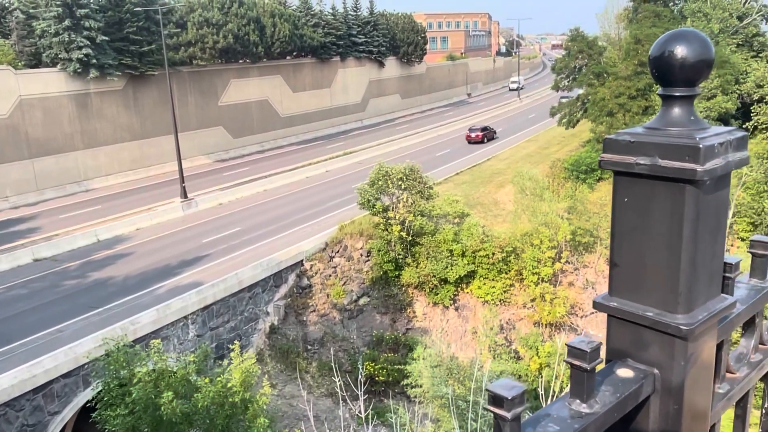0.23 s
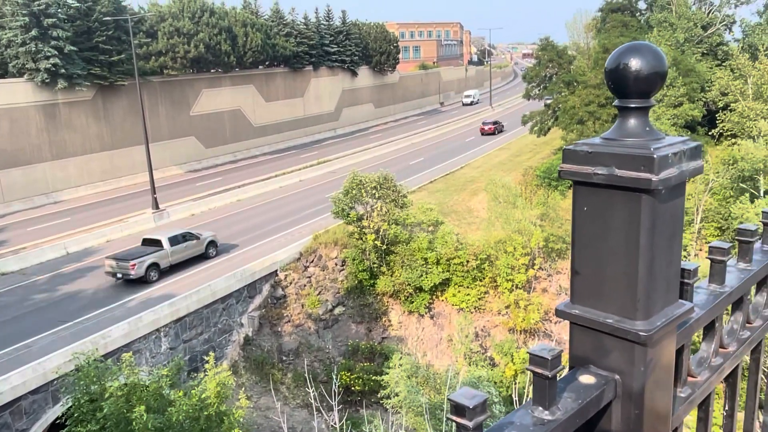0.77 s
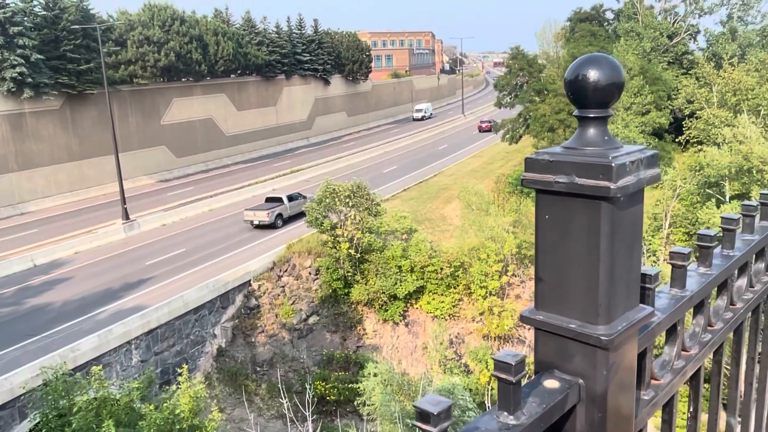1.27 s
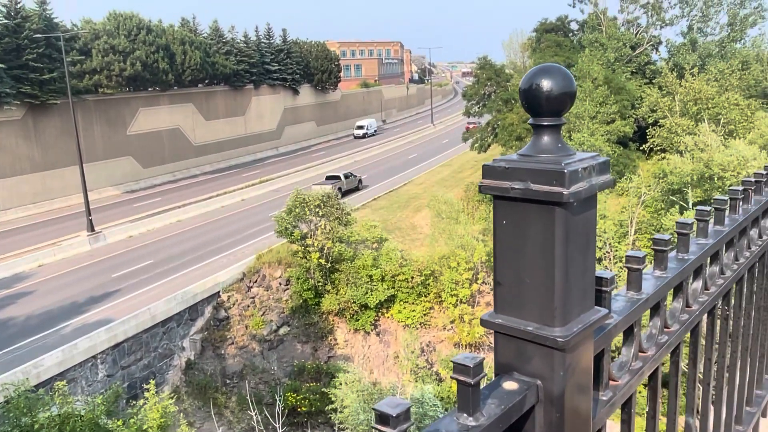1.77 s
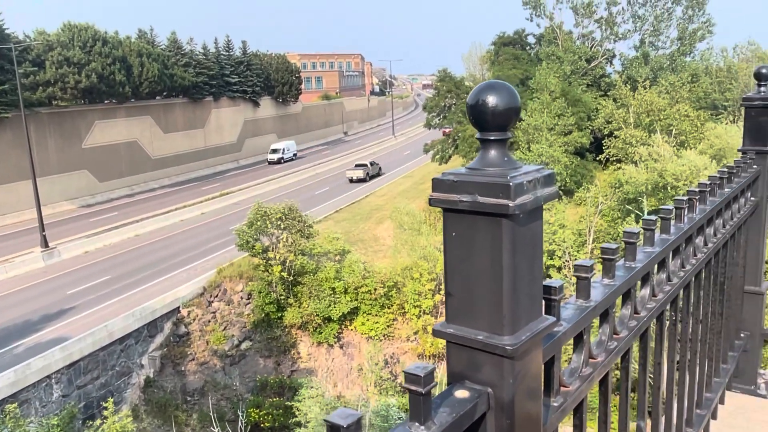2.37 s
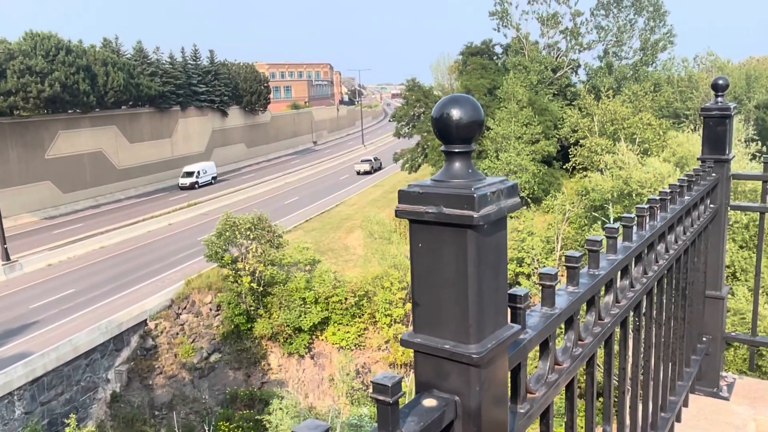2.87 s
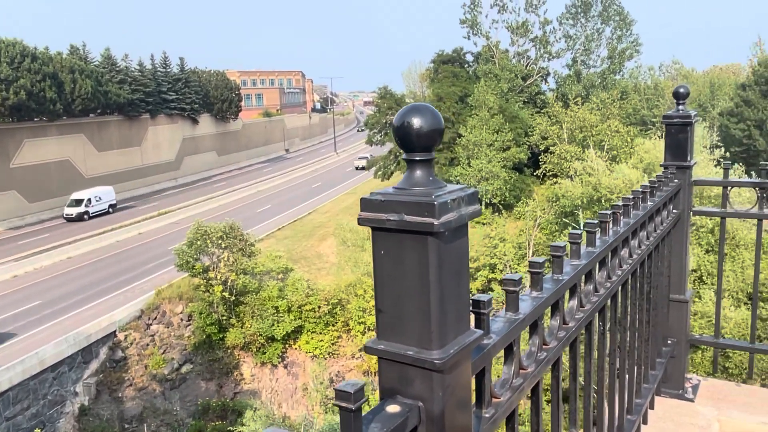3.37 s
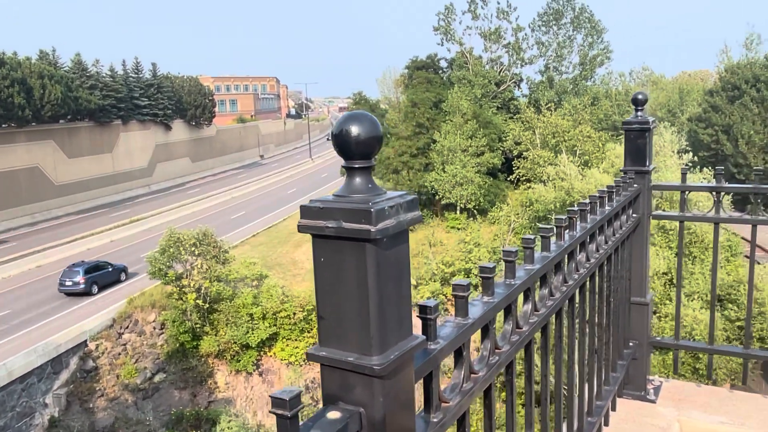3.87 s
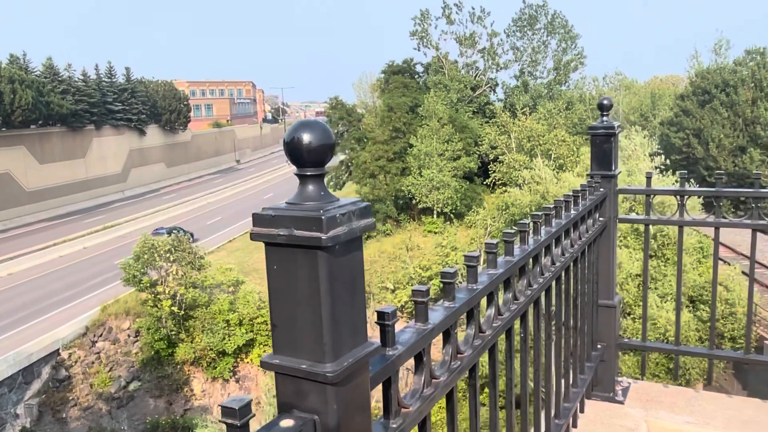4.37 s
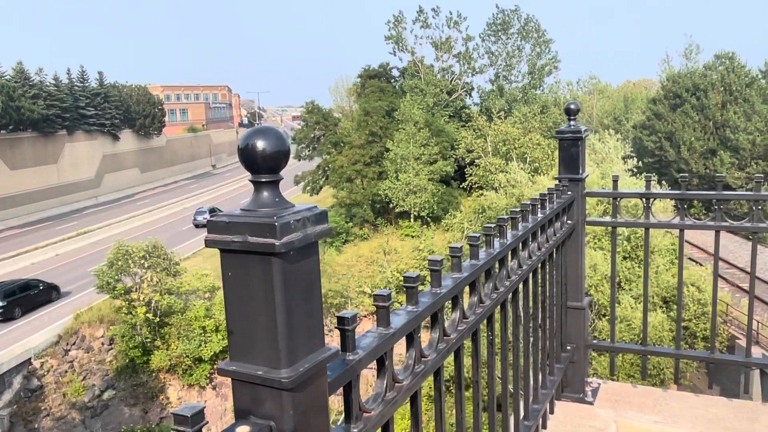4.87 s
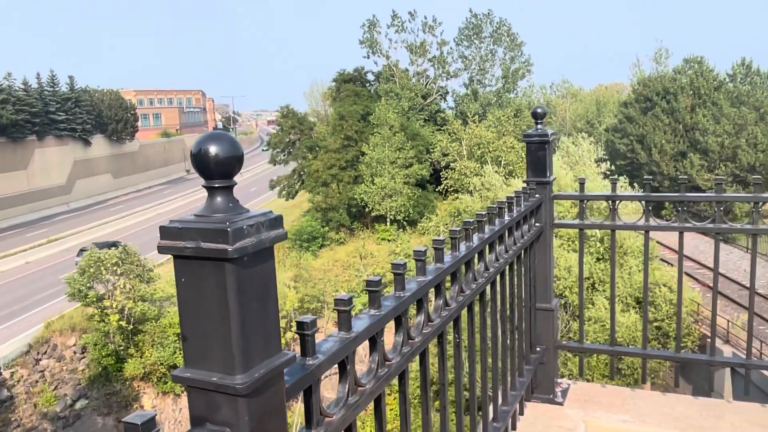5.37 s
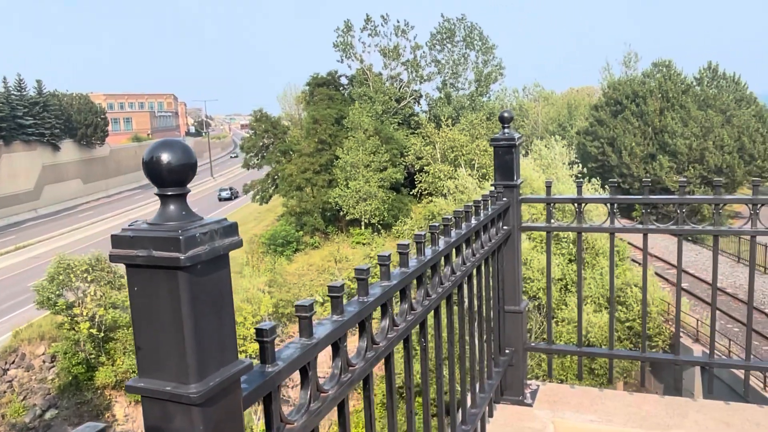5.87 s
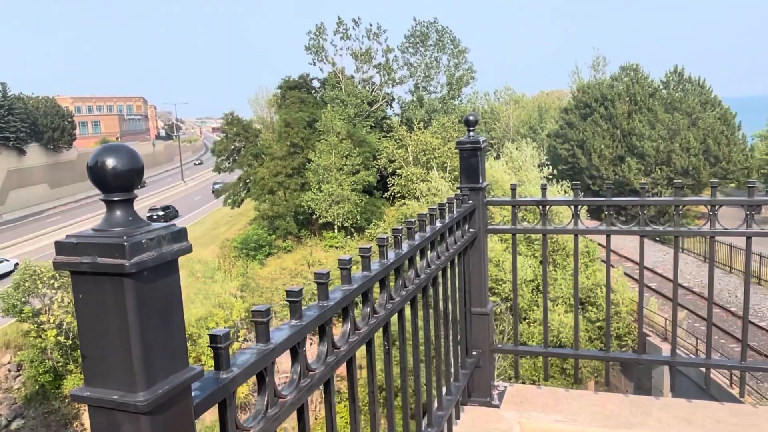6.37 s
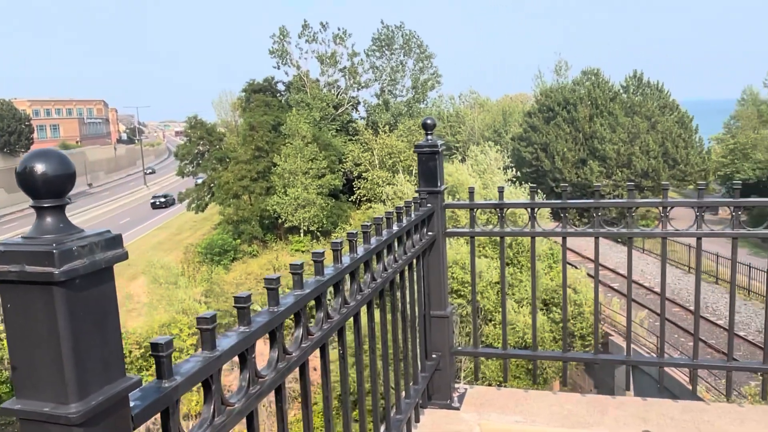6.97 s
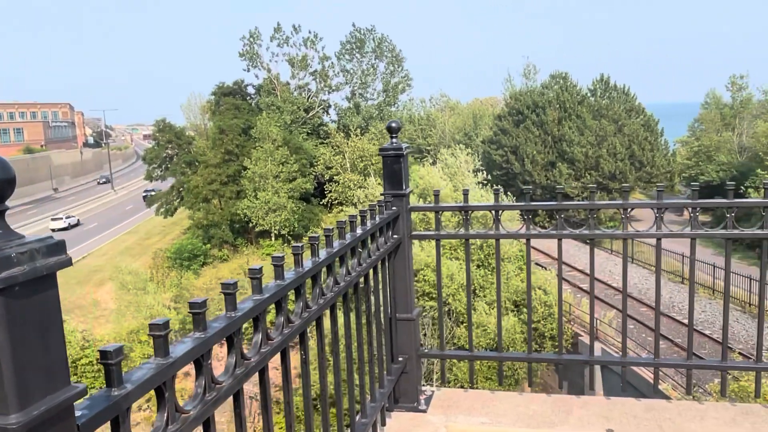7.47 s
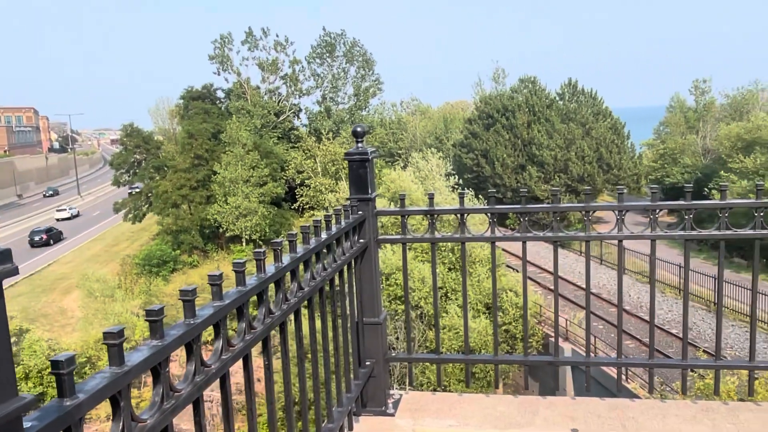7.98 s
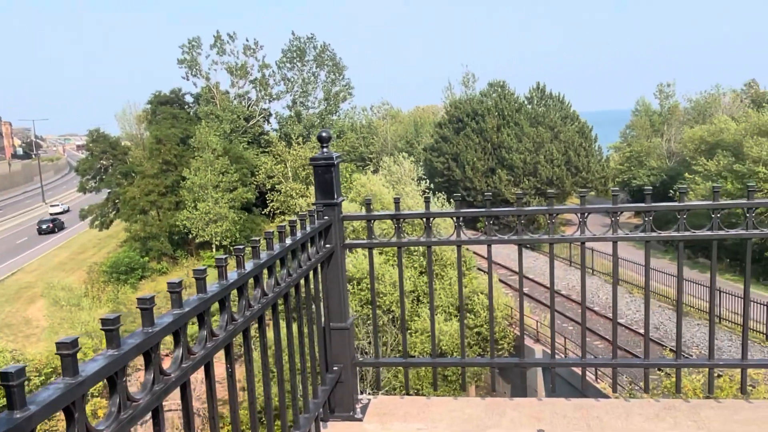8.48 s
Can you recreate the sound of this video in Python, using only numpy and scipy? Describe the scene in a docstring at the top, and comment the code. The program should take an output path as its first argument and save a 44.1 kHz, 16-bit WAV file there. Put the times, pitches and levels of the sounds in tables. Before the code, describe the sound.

Steady highway traffic roars below an overlook, single cars swelling past, two quick joint slaps, and low wind thumps on the microphone.

```python
"""A steady drone and tyre roar rise from a highway below an overlook, swelling as single cars go by.
Coloured noise makes the merged traffic.
Cars near and far, and passing changes in the roar, swell in narrower noise bands.
Two vehicles slap and rattle over a road joint, front axle then rear: short rings that sag in pitch.
Light wind rumbles on the microphone as low noise, and now and then thumps it with one short swing."""
import sys
import numpy as np
from scipy import signal
from scipy.fft import rfft, irfft, next_fast_len
from scipy.io import wavfile
from scipy.ndimage import uniform_filter1d, map_coordinates

SR = 44100
rng = np.random.default_rng(int(sys.argv[2]) if len(sys.argv) > 2 else 0)


def dump_mix(stems):
    """Bounce the given channels to the path in sys.argv[1] as a 16-bit WAV at rate SR."""
    frames = np.atleast_2d(stems).T  # one column per channel
    limited = np.clip(frames, -1, 1)  # hard clip at full scale
    pcm = np.round(limited * 32767).astype(np.int16)
    wavfile.write(sys.argv[1], SR, pcm)


N = 384269  # length in samples


def amp(db):
    """Turn decibels into a gain."""
    return 10 ** (np.asarray(db) / 20)


def unit(x):
    """Scale a sound to an rms of 1."""
    return x / np.sqrt(np.mean(x ** 2) + 1e-20)


def along(points, hz):
    """Read each column of a table at the given frequencies, on a log axis."""
    f, *columns = np.transpose(points)
    return [np.interp(np.log(hz + 1), np.log(f), column) for column in columns]


def wobble(rate):
    """Draw a smooth random curve through `rate` random points a second."""
    knots = rng.standard_normal(4096)
    return map_coordinates(knots, [np.arange(N) * rate / SR])


def swell(s, half):
    """A bell-shaped rise and fall around time s, 1 at the top."""
    return np.exp(-((np.arange(N) / SR - s) / half) ** 2)


def filtered(x, response):
    """Shape a sound by a gain that depends on frequency."""
    m = next_fast_len(N + SR // 4, True)  # spare room so the end does not wrap round to the start
    spectrum = rfft(x, m) * response(np.fft.rfftfreq(m, 1 / SR))
    return irfft(spectrum, m)[..., :N]


def rush(spectrum, patchy_db):
    """Two unrelated noises of one colour, sharing patches of gain that drift in time and pitch."""
    z = signal.stft(rng.standard_normal((2, N)), nperseg=1024)[2]
    field = rng.standard_normal(z.shape[1:])
    field = uniform_filter1d(field, size=8, axis=0)  # smooth across pitch
    field = uniform_filter1d(field, size=7, axis=1)  # smooth across time
    patchy = z * amp(patchy_db * unit(field))
    pair = signal.istft(patchy, nperseg=1024)[1][:, :N]
    return unit(filtered(pair, lambda hz: amp(along(spectrum, hz)[0])))


# how close the stream of traffic runs: t/s, level/dB (each layer follows it by its own share)
TRAFFIC = [(0, 3.5), (.9, 0.3), (2.2, -0.5), (3.7, 1), (5.0, -0.7), (5.9, -5), (7.3, -6.5), (8.71, -5.5)]


def traffic_db():
    """The slow rise and fall of the traffic, before each layer scales it."""
    s, level_db = np.transpose(TRAFFIC)
    return np.interp(np.arange(N) / SR, s, level_db)


FLUTTER_DB, FLUTTER_RATE = .58, 21  # tyre noise flutters: depth in dB, random points a second


def flutter_db():
    """The quick, small unsteadiness of tyre noise."""
    return FLUTTER_DB * wobble(FLUTTER_RATE)


# colour of the engines: f/Hz, level/dB (per Hz, relative)
DRONE_SPECTRUM = [(40, -23), (90, -2.5), (150, -3), (200, 1), (280, -1.5), (360, -5), (460, -8), (600, -12),
                  (900, -39), (2000, -76)]


def drone(level_db=-32, follows=0.17):
    """Many engines merge into a low, nearly steady noise."""
    gain_db = level_db + follows * traffic_db() + 0.4 * wobble(6.1)
    return amp(gain_db) * rush(DRONE_SPECTRUM, patchy_db=0.0)


# colour of the rolling tyre carcasses: f/Hz, level/dB (per Hz, relative)
ROLLING_SPECTRUM = [(150, -8), (330, -7), (450, -8.5), (570, -2.5), (640, 3.5), (720, -4.5), (820, -7.5),
                    (1100, -2.5), (1600, -17), (3000, -60), (6000, -100)]


def rolling(level_db=-31.5, follows=1.5):
    """Tyre carcasses roll; this layer follows the traffic far more strongly than the others."""
    gain_db = level_db + follows * traffic_db() + 1.34 * wobble(5.0)
    return amp(gain_db) * rush(ROLLING_SPECTRUM, patchy_db=1.0)


# colour of the tyre roar: f/Hz, level/dB (per Hz, relative)
ROAR_SPECTRUM = [(300, -22), (520, -15.5), (640, -9.5), (720, -4.5), (800, 0.24), (1000, -1.7), (1500, -2),
                 (1900, -7.5), (2350, -19.5), (2900, -17.5), (3800, -28), (8000, -93)]


def roar(level_db=-25.5, follows=0.17, bunch_db=1.12):
    """Tyres roar; many of them average out, and a bunch of cars in the near lanes lifts the sound."""
    lift_db = bunch_db * swell(4.4, half=3.1) + flutter_db()
    gain_db = level_db + follows * traffic_db() + lift_db
    return amp(gain_db) * rush(ROAR_SPECTRUM, patchy_db=.9)


# colour of the tread hiss: f/Hz, level/dB (per Hz, relative)
HISS_SPECTRUM = [(1200, -30), (2400, -3), (2950, 2), (3900, -1), (5100, -1.5), (6300, -6.8), (7100, -12.5),
                 (8000, -18), (10000, -24), (12500, -36), (14000, -54)]


def hiss(level_db=-44.5, follows=0.17, bunch_db=3.36):
    """Air squeezed from the treads of the nearest few tyres hisses, so it is clumpier than the roar."""
    lift_db = bunch_db * swell(5.07, half=1.6) + flutter_db()
    gain_db = level_db + follows * traffic_db() + lift_db
    return amp(gain_db) * rush(HISS_SPECTRUM, patchy_db=1.6)


def stream():
    """Many vehicles merge into one sound with four layers."""
    return drone() + rolling() + roar() + hiss()


# swells of cars near and far (tyre song or engine hum) and passing changes in the roar:
# t/s, level/dB (at the top of the swell, before flutter and ports), centre f/Hz, width/octaves,
# half length/s (time from the top to half the amplitude)
CARS = [(0.01, -20.5, 520, 0.89, 0.043), (0.17, -31, 314, 0.21, 0.26), (0.19, -31, 900, 0.37, 0.13),
        (0.383, -48, 4470, 0.52, 0.15), (1.06, -36, 242, 0.16, 0.44), (1.8, -38.5, 1840, 0.17, 1),
        (1.8, -39.5, 647, 0.1, 0.6), (2.29, -48, 4740, 0.29, 0.034), (2.51, -31.5, 1100, 0.6, 0.081),
        (2.614, -28.5, 704, 0.54, 0.075), (3.293, -28, 900, 0.52, 0.06), (3.5, -47, 4350, 0.38, 0.23),
        (3.597, -30, 710, 0.41, 0.12), (3.61, -31.5, 208, 0.36, 0.11), (3.688, -34.5, 1840, 0.18, 0.19),
        (4.15, -32.5, 198, 0.17, 0.25), (4.15, -43, 4660, 0.32, 0.056), (4.27, -40.5, 4300, 0.31, 0.14),
        (4.4, -33, 885, 0.62, 0.18), (4.902, -45.5, 2950, 0.15, .25), (4.75, -35.5, 1890, 0.17, 1),
        (5.335, -28, 830, 0.52, 0.12), (5.478, -34.5, 265, 0.59, 0.35), (5.95, -37, 282, 0.13, 0.67),
        (6.146, -45, 4900, 0.25, 0.05), (6.3, -47, 4830, 0.3, 0.64), (7.574, -32, 1650, 0.41, 0.17),
        (7.74, -33, 905, 0.6, 0.14), (7.55, -49.5, 4870, 0.3, 0.37), (7.583, -41, 2600, 0.3, 0.17),
        (6.6, -34.5, 1350, 0.14, 0.44), (7.8, -32.5, 1280, 0.087, 0.84), (8.3, -40.5, 790, 0.064, 0.54)]


def cars():
    """Cars near and far, and passing changes in the roar, rise and fall in narrower noise bands."""
    t, out = np.arange(N) / SR, np.zeros((2, N))
    for s, db, centre_hz, octaves, half in CARS:
        band = lambda hz: np.exp(-.5 * (np.log2((hz + 1) / centre_hz) / octaves) ** 2)
        noise_band = unit(filtered(rng.standard_normal((2, N)), band))
        rise_and_fall = 1 / (1 + ((t - s) / half) ** 2)  # for a car: spreading and forward beam together
        out += amp(db) * rise_and_fall * noise_band
    return out * amp(flutter_db())


# tyres slapping a road joint and rattling after it:
# t/s (start), level/dB (before JOINT_DB and ports), cavity f/Hz (the middle of the pitch sag)
SLAPS = [(.514, -22, 870), (.528, -23, 700), (.541, -23, 660), (.631, -22, 790), (.689, -18, 800),
         (.700, -24, 820), (4.292, -16.5, 800), (4.309, -17, 850), (4.324, -18, 920), (4.335, -23, 850),
         (4.419, -16, 850), (4.434, -15.5, 840), (4.450, -25, 780)]
JOINT_DB = 2.4  # how loudly the road joint carries to the overlook, in dB


def joint(rise_s=0.0042, sag=0.12, rough=0.5):
    """A tyre rolling over the joint pumps the air in the gap: a ring that builds, sags in pitch and dies."""
    t, out = np.arange(SR // 16) / SR, np.zeros((2, N))
    pump = (t / rise_s) ** 2 * np.exp(2 * (1 - t / rise_s))  # loudest after rise_s
    pitch = 1 + sag * (np.exp(-t / rise_s) * 2 - 1)  # from 12 % above the cavity pitch to 12 % below
    glide = np.cumsum(pitch) / SR
    hz = np.fft.rfftfreq(len(t), 1 / SR)
    for s, db, cavity_hz in SLAPS:
        band = np.exp(-(np.log2((hz + 1) / cavity_hz) / 0.55) ** 2)
        random_phase = np.exp(2j * np.pi * rng.random(len(band)))
        grit = unit(irfft(band * random_phase, len(t)))
        ring = np.sin(2 * np.pi * cavity_hz * glide) + rough * grit
        # row 0 is the part that both ports share
        out[0, round(s * SR):][:len(t)] += amp(db + JOINT_DB) * pump * ring
    return out


# the two microphone ports: f/Hz, likeness (coherence, 0 to 1), left lead/rad, left over right level/dB
PORTS = [(100, .85, 0, -2), (280, .94, .05, -4), (440, .65, .7, -7), (560, .88, 1.6, -4),
         (850, .73, 2.0, -.3), (1500, .56, 2.75, -2), (1850, .25, 4.3, -2), (2100, .4, 6.1, -.5),
         (2350, .5, 6.6, 0), (2800, .55, 5.2, -3.8), (3600, .3, 6.1, -1), (4300, .62, 5.8, .3),
         (5400, .3, 5.2, -2), (6100, .33, 6.6, 0), (7000, .65, 8.9, 0), (8300, .8, 9.6, 0),
         (10500, .6, 11.5, 0)]


def at_ports(pair):
    """Road sound reaches the two ports partly alike, shifted in phase and shaded by the casing."""
    m = next_fast_len(N + SR // 4, True)
    alike, lead, balance_db = along(PORTS, np.fft.rfftfreq(m, 1 / SR))
    # mix a shared and an opposed part so that the ports agree as much as the table says
    turn = np.arccos(np.clip(alike, 0, 1)) / 2
    common, apart = rfft(pair, m) * [np.cos(turn), np.sin(turn)]
    skew = amp(balance_db / 2) * np.exp(.5j * lead)  # half to the left, the opposite half to the right
    left, right = (common + apart) * skew, (common - apart) / skew
    return irfft(np.array([left, right]), m)[:, :N]


# colour of the wind rumble: f/Hz, level/dB (per Hz, relative)
RUMBLE_SPECTRUM = [(20, -42), (35, -25), (52, 0), (66, 0), (88, 0.5), (130, -8), (200, -13.5), (400, -31),
                   (1200, -71)]
# colour of the flapping in strong gusts: f/Hz, level/dB (per Hz, relative)
FLAP_SPECTRUM = [(60, -25), (130, 0), (350, -3), (550, -12), (1200, -45), (3000, -90)]
# gusts on the microphone: t/s, rumble level/dB (before the breeze and ports), half length/s
GUSTS = [(0.136, -29, 0.04), (0.58, -28.5, 0.14), (1.03, -28.5, 0.16), (1.93, -32, 0.1),
         (2.222, -26.5, 0.08), (2.5, -32, .04), (4.38, -27, 0.11), (4.66, -29, 0.07), (4.88, -30, 0.09),
         (5.4, -34, 0.12), (5.88, -32, .12), (7.346, -32, 0.047), (7.78, -31, 0.16), (8.31, -24.5, 0.12),
         (8.58, -26, 0.057)]
BREEZE_DB, BREEZE_WAVER_DB = -33.5, 1.3  # the wind between gusts: level and waver in dB
FLAP_DB = -7  # flapping in the strongest gust, in dB over the rumble


def wind(lumpy_db=2.0, apart=0.5):
    """A breeze and its gusts rumble, partly different on each port; a strong gust also flaps higher up."""
    breeze = amp(BREEZE_DB + BREEZE_WAVER_DB * wobble(7))
    gust_power = sum(amp(db) ** 2 * swell(s, half) for s, db, half in GUSTS)
    strength = np.sqrt(breeze ** 2 + gust_power)
    flapping = amp(FLAP_DB) * (strength / strength.max()) ** 2 * rush(FLAP_SPECTRUM, patchy_db=0.0)
    air = rush(RUMBLE_SPECTRUM, patchy_db=0.0) + flapping
    lumps = unit(amp(lumpy_db * np.array([wobble(28), wobble(30)])))
    common, own = air * lumps
    port_gain = amp([[-2.4], [-1.4]])  # left, right
    return strength * port_gain * np.array([common + apart * own, common - apart * own])


# eddies striking the microphone: t/s (middle), level/dB (before the port balance), centre f/Hz
EDDIES = [(.140, -15, 130), (.506, -20, 150), (.548, -16, 160), (.570, -20, 150), (.646, -19, 100),
          (.676, -15, 105), (.915, -16, 140), (1.012, -19.5, 140), (1.106, -11, 115), (2.159, -12.5, 150),
          (2.173, -16, 95), (2.201, -16, 85), (2.239, -13, 110), (2.272, -20, 100), (2.490, -20, 118),
          (2.784, -20.5, 123), (4.405, -15.5, 100), (4.450, -17, 156), (4.526, -19.5, 100),
          (4.704, -17.5, 78), (7.826, -19.5, 96), (8.189, -15, 170), (8.241, -17, 240), (8.248, -10.5, 370),
          (8.255, -14.5, 130), (8.293, -9, 135), (8.308, -16.5, 105), (8.356, -16.5, 80), (8.384, -15, 93),
          (8.417, -13.5, 126), (8.540, -19.5, 130), (8.612, -20, 93)]


def eddies(cycles=0.42, slowing=0.14, ragged=0.12, ragged_hz=300):
    """An eddy gives one short, ragged pressure swing that slows as it leaves; the right port takes more."""
    t, out = np.arange(-SR // 20, SR // 20) / SR, np.zeros(N)
    ragged_band = lambda hz: np.exp(-np.log2((hz + 1) / ragged_hz) ** 2)
    churn = ragged * unit(filtered(rng.standard_normal(N), ragged_band))
    for s, db, centre_hz in EDDIES:
        turns = t * centre_hz
        start = round((s + t[0]) * SR)
        phase = 2 * np.pi * (turns - slowing * (np.hypot(turns, 1) - 1) + rng.random())
        swing = np.cos(phase) + churn[start:][:len(t)]
        fade = np.hanning(len(t)) / np.cosh(turns / cycles)
        out[start:][:len(t)] += amp(db) * swing * fade
    return amp([[-.7], [.7]]) * out  # left, right


def scene():
    """The road from afar, the wind right at the microphone."""
    return at_ports(stream() + cars() + joint()) + wind() + eddies()


TOP_HZ = 13800  # band limit in Hz


def record(dry):
    """Keep nothing at or above the band limit."""
    return filtered(dry, lambda hz: hz < TOP_HZ)


dry = scene()
out = record(dry)
dump_mix(out)
```